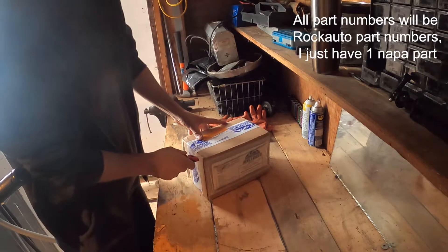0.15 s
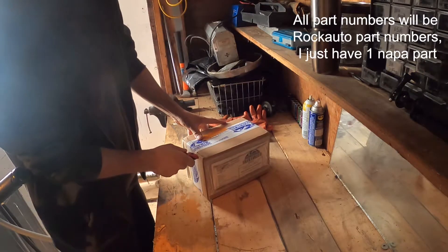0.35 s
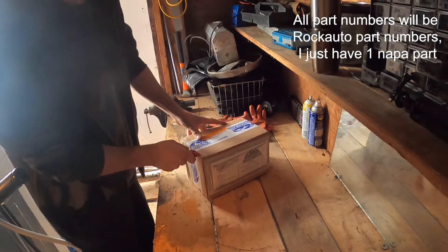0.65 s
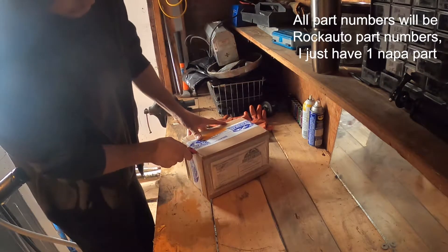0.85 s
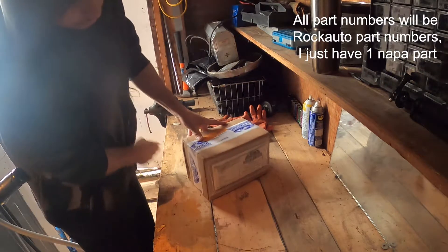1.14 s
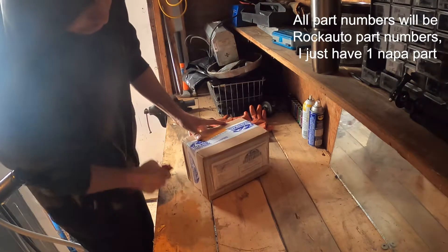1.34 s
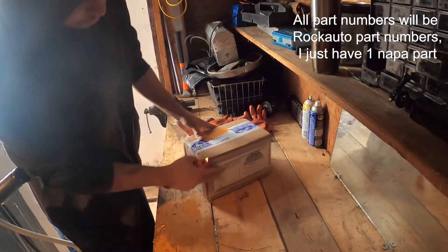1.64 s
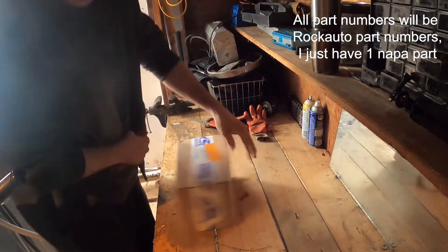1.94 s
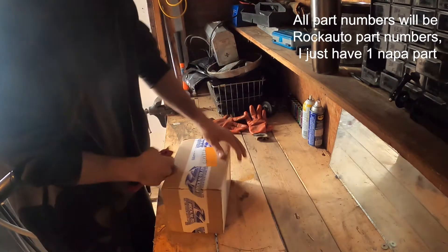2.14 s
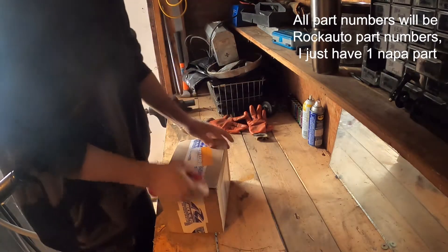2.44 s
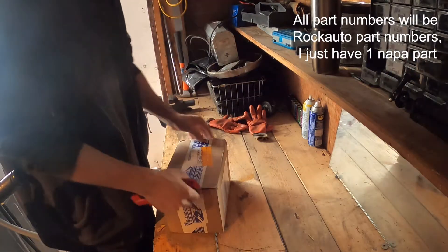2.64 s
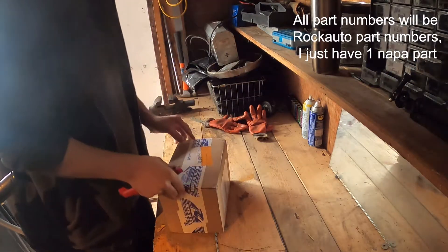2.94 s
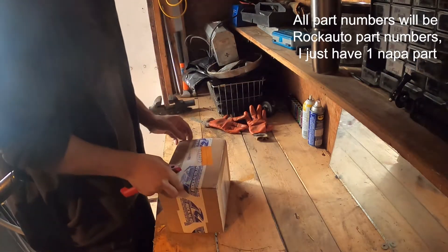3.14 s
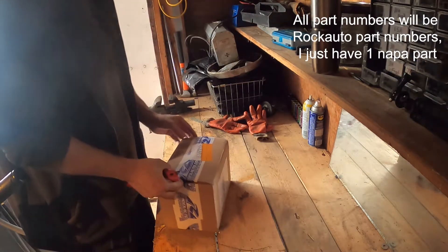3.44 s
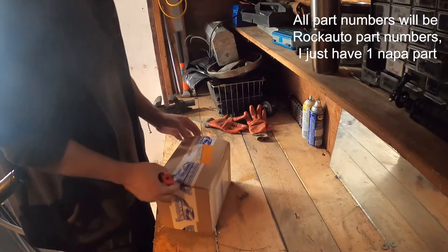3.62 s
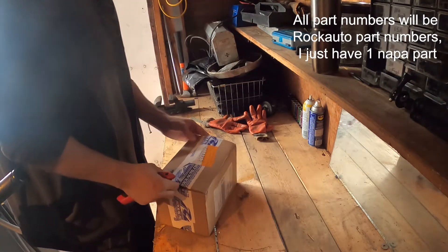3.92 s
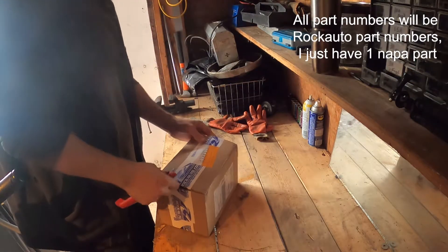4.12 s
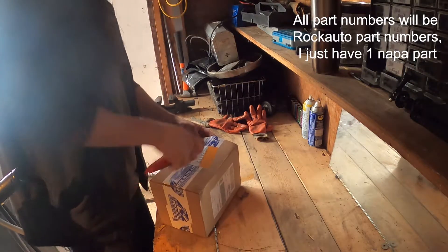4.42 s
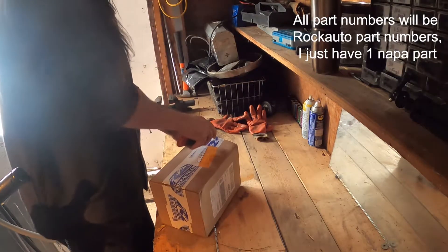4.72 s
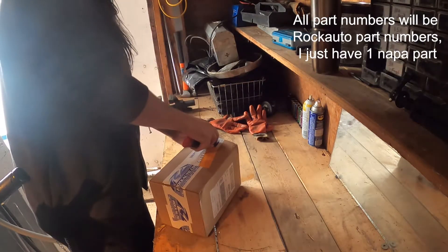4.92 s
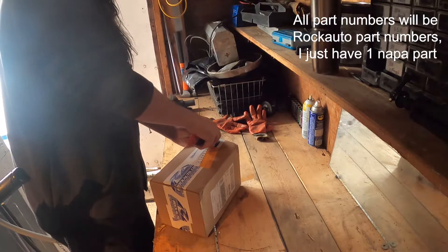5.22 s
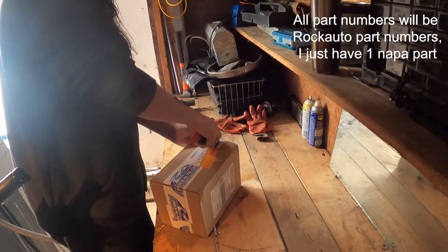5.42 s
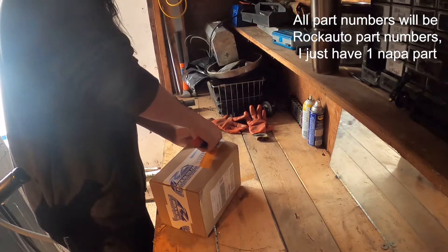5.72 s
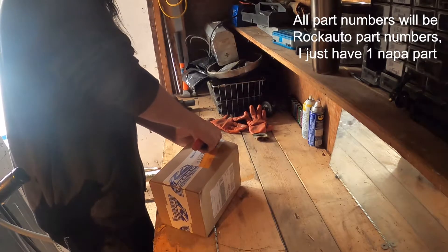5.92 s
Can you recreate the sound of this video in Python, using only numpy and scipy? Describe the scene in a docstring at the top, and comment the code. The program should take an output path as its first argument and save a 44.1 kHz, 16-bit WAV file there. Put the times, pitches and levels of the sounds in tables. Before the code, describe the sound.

Close in a small garage with a low, slowly growing rumble, a blade pricks tape and hands rub a cardboard box. Tape rips in sharp jerks with hollow thumps, then the box scrapes loudly round on a gritty wooden bench and knocks down. Light scratching, brief gritty slitting, a handle click and small crackling picks follow.

```python
"""A low, steady rumble fills a small garage; a blade tip pricks tape, a box is bumped and hands rub over it.
Then a utility knife rips the tape in jerks, and the box is swung round on a gritty wooden bench and set down.
The blade slits the top seam, clicks in its handle and picks at the far end of the tape.
Tape and grit are showers of tiny fractures under stick-slip envelopes, bumps are damped modes, the rest is
filtered noise; shifting reflections and a short tail reach a camera with two close microphone ports."""
import sys
import numpy as np
from scipy import signal
from scipy.fft import rfft, irfft, next_fast_len
from scipy.io import wavfile
from scipy.ndimage import uniform_filter1d

SR = 44100
rng = np.random.default_rng(int(sys.argv[2]) if len(sys.argv) > 2 else 0)


def to_wav(s):
    """Save 16-bit WAV."""
    ch = np.atleast_2d(s).T  # columns
    pcm = np.round(np.clip(ch, -1, 1) * 32767)  # PCM
    wavfile.write(sys.argv[1], SR, pcm.astype(np.int16))


N = 267587
T = np.arange(N) / SR
# padded transform length, and the frequency of each bin
SIZE = next_fast_len(N + SR // 4, real=True)
HZ = np.maximum(np.arange(SIZE // 2 + 1) * SR / SIZE, 1)
SIDES = np.array([[1], [-1]])  # left and right port

# Colour of the box walls drumming. Each row: frequency in Hz, relative level in dB.
BOX_DRUM = [(40, -7.5), (70, 4.5), (105, 1), (135, -7), (168, -0.5), (200, -8), (240, -11), (330, -18),
            (600, -30.5)]
# Resonances of the box bottom. Each row: frequency in Hz, width in Hz, lift in dB.
BOX_BOTTOM = [(350, 35, 2.5), (472, 21, 2), (1300, 70, 0.5), (1560, 73, -1), (1670, 86, 3), (3230, 60, -3),
              (3500, 59, 6.5), (4800, 45, 0.5)]
# Colour of snapping tape and cardboard. Each row: frequency in Hz, relative level in dB.
SNAP_TONE = [(700, -17), (1500, 5.5), (3000, -0.5), (5000, -3), (8000, -11), (11000, -22), (15000, -38)]
# Colour of a hollow knock from the box. Each row: frequency in Hz, relative level in dB.
KNOCK_TONE = [(110, -5.5), (180, 8.5), (330, 1), (480, 1), (700, -7), (1300, -8.5), (2500, -34)]


def undb(db):
    """Decibels to gain."""
    return 10 ** (np.asarray(db) / 20)


def unit(x):
    """Scale to rms 1."""
    return x / np.sqrt(np.mean(x ** 2))


def noise():
    """White noise of rms about 1."""
    return rng.standard_normal(N)


def walk(rate):
    """Smooth random drift of rms 1 that takes a new value `rate` times a second."""
    k = max(int(SR / rate), 1)
    steps = np.repeat(rng.standard_normal(N // k + 1), k)[:N]
    return unit(uniform_filter1d(steps, k))


def grains(rate, spread_db):
    """Tiny fractures at random moments, a few much larger than the rest, scaled to rms 1."""
    chance = rng.random(N)
    at = np.flatnonzero(chance < rate / SR)
    # the rarest fractures are the largest; each pushes or pulls
    rarity = np.minimum(-np.log(chance[at] * SR / rate), 3)
    push = np.where(rng.integers(0, 2, N, dtype=bool)[at], 1, -1)
    return unit(np.bincount(at, undb(spread_db * rarity) * push, N))


def slips(rate, scatter_db, decay_s):
    """Stick-slip envelope: tension lets go at uneven intervals and each release dies away."""
    chance = rng.standard_normal((8000, 2))
    wait = np.exp(.5 * np.clip(chance[:, 0], -2, 2))
    at = (np.cumsum(wait) * SR / rate).astype(int)
    # a longer wait stores more tension
    size = np.sqrt(wait) * undb(scatter_db * np.tanh(chance[:, 1]))
    kicks = np.bincount(at[at < N], size[at < N], N)
    return unit(signal.lfilter([1], [1, -np.exp(-1 / (decay_s * SR))], kicks))


def shape(points):
    """Gain at every frequency from (Hz, dB) points, falling steeply beyond the ends."""
    hz, db = np.transpose(points)
    octaves_beyond = np.maximum(np.log2(hz[0] / HZ), 0) + np.maximum(np.log2(HZ / hz[-1]), 0)
    return undb(np.interp(np.log(HZ), np.log(hz), db) - np.minimum(30 * octaves_beyond, 60))


def body(x, points, resonances=()):
    """Causal filter of a broad colour with resonant peaks; white noise keeps its power."""
    gain = shape(points)
    for hz, width, db in resonances:
        gain = gain * (1 + (undb(db) - 1) / (1 + (2 * (HZ - hz) / width) ** 2))
    # folding the cepstrum forward in time gives the minimum phase
    cepstrum = irfft(np.log(unit(gain)), SIZE)
    cepstrum[1:SIZE // 2] *= 2
    cepstrum[SIZE // 2:] = 0
    return irfft(rfft(x, SIZE) * np.exp(rfft(cepstrum)), SIZE)[:N]


def roaming(x, points, resonances, shift, rate):
    """The contact wanders over the cardboard, and its resonances sit higher or lower from place to place."""
    place, spots = walk(rate), (-1, 0, 1)
    shares = np.array([np.exp(-3 * (place - k) ** 2) for k in spots])
    shares /= shares.sum(0)
    out = np.zeros(N)
    for k, share in zip(spots, shares):
        moved = [(hz * (1 + shift * k), width, db) for hz, width, db in resonances]
        out += body(x * share, points, moved)
    return out


def ring(modes, t, tilt_db=0):
    """Damped modes after one blow, tilted in dB per octave above the first."""
    out = np.zeros(len(t))
    for hz, db, t60 in modes:
        level_db = db + tilt_db * np.log2(hz / modes[0][0]) - 60 * t / t60
        out += undb(level_db) * np.sin(2 * np.pi * hz * t)
    return out


def add(out, s, sound):
    """Mix a sound in at a time."""
    i = max(int(s * SR), 0)
    out[i:i + len(sound)] += sound[:max(N - i, 0)]


def gains(rows):
    """One gain curve for each dB column, silent outside the rows."""
    s, *columns = np.transpose(rows)
    out, inside = np.zeros((len(columns), N)), (T >= s[0]) & (T <= s[-1])
    out[:, inside] = [undb(np.interp(T[inside], s, c)) for c in columns]
    return out


def stroke(s, length, swell_db, attack_s, release_s):
    """Pressure of one hand movement: it builds, holds while swelling or easing, and dies away."""
    out = np.zeros(N)
    span = slice(max(int((s - attack_s) * SR), 0), int((s + length + 8 * release_s) * SR))
    t = T[span] - s
    build = np.clip(1 + t / attack_s, 0, 1) ** 2
    hold = undb(swell_db * (np.clip(t / length, 0, 1) - .5))
    out[span] = build * hold * np.exp(-np.maximum(t - length, 0) / release_s)
    return out


def strokes(rows, attack_s, release_s):
    """One summed pressure curve for each level column between length and swell."""
    return sum(undb(dbs)[:, None] * stroke(s, length, swell, attack_s, release_s)
               for s, length, *dbs, swell in rows)


def bursts(rows, knock_s, snap_s, split_db):
    """Envelopes of the knock and the snap of sudden cracks; each snap starts with a sharp split."""
    knocks, snaps, t = np.zeros(N), np.zeros(N), T[:SR // 8]
    split = undb(split_db) * np.exp(-t / .0007)
    for s, snap_db, knock_db in rows:
        add(knocks, s, undb(knock_db) * np.exp(-t / knock_s))
        add(snaps, s, undb(snap_db) * (np.exp(-t / snap_s) + split))
    return knocks, snaps


def squeaks(rows, waver, waver_rate):
    """Short unsteady stick-slip tones of an edge that catches."""
    out, drift = np.zeros(N), waver * walk(waver_rate)
    for s, hz, length, db in rows:
        span = slice(int((s - length / 2) * SR), int((s + length / 2) * SR))
        phase = 2 * np.pi * np.cumsum(hz * (1 + drift[span])) / SR
        swell = np.sin(np.linspace(0, np.pi, len(phase)))
        out[span] += undb(db) * np.sqrt(2) * swell * np.sin(phase)
    return out


def apart(x):
    """The part of a diffuse sound that differs between the ports, strongest in the treble."""
    # Difference between the ports. Each row: frequency in Hz, side minus mid of diffuse sound in dB.
    side_rows = [(100, -25.5), (300, -10), (700, -10), (1500, -9.5), (3000, -3.5), (6000, -0.5)]
    hz, db = np.transpose(side_rows)
    return irfft(rfft(x, SIZE) * undb(np.interp(np.log(HZ), np.log(hz), db)), SIZE)[:N]


def background():
    """A slowly growing rumble nearly alike at both ports, and faint wavering air that differs more."""
    # Colour of the garage rumble. Each row: frequency in Hz, relative level in dB.
    rumble_tone = [(12, -31.5), (20, 0.5), (38, -2), (91, 1), (113, -1.5), (121, -14), (130, -15),
                   (161, -13.5), (195, -24), (229, -18.5), (265, -41.5), (300, -36.5), (390, -52.5),
                   (660, -120)]
    # Colour of the garage air. Each row: frequency in Hz, relative level in dB.
    air_tone = [(150, -40.5), (250, -11.5), (350, -2.5), (414, -5), (499, -9), (533, -23.5), (600, -9.5),
                (869, -17.5), (1060, -4.5), (1350, -11.5), (1540, -12), (1920, -18.5), (2920, -27.5),
                (6560, -34.5), (14000, -66)]
    rise_db = 0.73 * (T - T[-1])  # dB per second
    # the air is up to 4 dB louder around one moment
    lift_db = 4 * (np.exp(-((T - 3.97) / 1.4) ** 2) - 1)
    rumble = body(noise(), rumble_tone) + undb(-16.5) * SIDES * body(noise(), rumble_tone)
    air = body(noise(), air_tone) + undb(2.5) * SIDES * apart(body(noise(), air_tone))
    return undb(-41 + rise_db) * rumble + undb(-61.5 + 0.23 * walk(27) + lift_db) * air


def sleeves():
    """Clothing whispers faintly, coming and going as the arms move."""
    # Colour of rustling cloth. Each row: frequency in Hz, relative level in dB.
    cloth_tone = [(2500, -5), (5800, 0), (8500, -5), (11000, -19)]
    level = undb(-81.5 + 3 * np.tanh(walk(7)))
    return body(level * grains(rate=4600, spread_db=3), cloth_tone)


def creaks(per_s, snap_db, knock_db, spread_db):
    """The shifting grip makes faint cracks at random moments, as rows like those of the picks."""
    when, snap, knock = rng.random((200, 3))[:int(per_s * T[-1])].T
    return np.column_stack([when * T[-1], snap_db - spread_db * snap, knock_db - spread_db * knock])


def picks():
    """The blade tip pricks the tape: a snap of tiny fractures and a hollow answer from the box."""
    # Pricks of the tip. Each row: start in seconds, relative snap level in dB, relative knock level in dB.
    prick_rows = [(.1435, -49, -59.5), (4.9837, -47.5, -55.5), (5.216, -58.5, -56), (5.4216, -39, -54.5),
                  (5.539, -53, -50), (5.553, -46, -55), (5.7175, -38, -49), (5.865, -55.5, -56),
                  (5.952, -50.5, -56.5), (6.0594, -41.5, -50.5)]
    # Colour of a prick. Each row: frequency in Hz, relative level in dB.
    prick_tone = [(600, -4.5), (1500, 6.5), (2600, -1.5), (4500, -11), (8000, -17.5), (11000, -35.5)]
    faint = creaks(per_s=5, snap_db=-59.5, knock_db=-64.5, spread_db=5.5)
    pokes, pricks = bursts([*prick_rows, *faint], knock_s=0.013, snap_s=0.008, split_db=-4.5)
    tip = body(pricks * grains(rate=18000, spread_db=2.0), prick_tone, BOX_BOTTOM)
    return undb(-9.5) * tip + undb(6.5) * body(pokes * noise(), KNOCK_TONE)


def thumps(ring_db):
    """A soft blow swings the box wall through a cycle or two, and box and bench ring on."""
    # Bumps and knocks on the bench. Each row: start in seconds, relative level in dB, pitch of the blow in Hz.
    bump_rows = [(0.178, -38, 285), (.879, -21.5, 96), (.916, -24, 70.5), (0.985, -17.5, 80),
                 (1.017, -16.5, 132), (1.07, -26.5, 118.7), (1.903, -27.5, 172), (2.195, -20, 173),
                 (2.7456, -37.5, 187), (3.159, -40, 316), (3.175, -33, 94), (3.767, -22, 137),
                 (3.795, -25, 101), (4.199, -28, 125), (4.2686, -24.5, 107), (4.335, -42, 150),
                 (4.984, -43.5, 210), (5.542, -39, 330)]
    # Modes of box and bench. Each row: frequency in Hz, relative level in dB, time to fall 60 dB in seconds.
    box_modes = [(77.5, -8.5, 0.56), (101, -10, 0.29), (149, -15.5, 0.27), (228.2, -18, 0.17),
                 (338, -26, 0.26), (440.5, -21, 0.085), (630, -27, 0.06)]
    out, t = np.zeros(N), T[:SR // 2]
    ringing = undb(ring_db) * ring(box_modes, t)
    for s, db, hz in bump_rows:
        blow = -np.sin(2 * np.pi * hz * t) * np.sin(np.pi * np.minimum(hz * t / 2.3, 1))
        add(out, s, undb(db) * (blow + ringing))
    return out


def hands():
    """Skin and cloth brush the box: a dull rub under a dry hiss."""
    # Brushes. Each row: start in seconds, length in seconds, relative rub level in dB,
    # relative hiss level in dB, swell over the stroke in dB.
    brush_rows = [(0.47, 0.082, -60.5, -89, 5), (0.58, 0.072, -59, -78, 4),
                  (0.732, 0.16, -56.5, -64.5, -0.5), (1.122, 0.32, -61.5, -73, -20.5),
                  (1.302, 0.028, -56.5, -72.5, -17), (2.212, 0.19, -48.5, -57, -11.5),
                  (2.422, 0.16, -55.5, -64.5, -12.5), (2.632, 0.31, -57.5, -60, -0.5),
                  (3.182, 0.1, -53, -63.5, -8), (3.361, 0.25, -65.5, -68, 8), (3.677, 0.14, -54.5, -62, 12),
                  (4.05, 0.14, -55, -75, -15), (4.279, 0.31, -54.5, -64, -11.5)]
    # Colour of the dull rub. Each row: frequency in Hz, relative level in dB.
    rub_tone = [(200, -24.5), (400, 3), (750, -11), (1300, -1.5), (2200, -6), (3200, -16.5), (4500, -20),
                (8000, -23)]
    # Colour of the dry hiss. Each row: frequency in Hz, relative level in dB.
    hiss_tone = [(1650, -23.5), (2800, -6), (3100, -8.5), (4240, -6), (6110, -12), (8490, -14),
                 (11000, -26.5), (12500, -25.5), (14000, -36), (15500, -40)]
    rub, hiss = strokes(brush_rows, attack_s=0.036, release_s=0.047)
    grip = unit(undb(1.9 * walk(110)))
    dull = body(rub * grip * grains(rate=4200, spread_db=2.0), rub_tone)
    dry_hiss = body(hiss * grip * grains(rate=7100, spread_db=2.5), hiss_tone)
    return undb(-5.5) * dull + undb(0.5) * dry_hiss


def pats(peak_s):
    """Fingertips press the box: each swelling touch crumples the tape and draws a hollow knock."""
    # Touches. Each row: start in seconds, relative knock level in dB, relative crumple level in dB.
    touch_rows = [(0.612, -55, -76), (0.637, -56.5, -82), (0.751, -51.5, -60.5), (1.156, -43.5, -78.5),
                  (1.55, -82, -62.5), (1.572, -58.5, -87), (3.18, -58, -60), (3.286, -52.5, -51.5),
                  (3.57, -67, -55), (5.208, -59.5, -71), (5.302, -59, -72), (5.476, -60.5, -65),
                  (5.564, -56.5, -64.5), (5.721, -55, -62.5), (5.741, -64, -67), (5.809, -58.5, -63),
                  (5.996, -59, -63.5)]
    knocks, creases, t = np.zeros(N), np.zeros(N), T[:SR // 8]
    press = t / peak_s * np.exp(1 - t / peak_s)
    for s, knock_db, crease_db in touch_rows:
        add(knocks, s, undb(knock_db) * press)
        add(creases, s, undb(crease_db) * press)
    crumple = body(creases * grains(rate=11000, spread_db=3), SNAP_TONE)
    return undb(3.0) * crumple + undb(5.5) * body(knocks * noise(), KNOCK_TONE)


def rips():
    """The tape gives way in jerks; each one sprays fractures and tugs the box wall."""
    # Tugs of the blade. Each row: start in seconds, length in seconds, relative levels in dB of tearing,
    # drumming of the box and fine sizzle, swell over the tug in dB.
    tug_rows = [(0.8791, 0.012, -36, -28.5, -35.5, -3.5), (0.899, 0.012, -43, -29.5, -59, -7),
                (0.981, 0.016, -32, -21, -37, 1), (1.012, .012, -34.5, -23, -36.5, 0),
                (1.026, .005, -27.5, -23.5, -39.5, 4), (1.037, 0.009, -28.5, -24.5, -33.5, 0),
                (1.065, 0.006, -28, -20.5, -52, 1), (4.188, 0.053, -53.5, -47.5, -55, 4),
                (4.246, 0.021, -42, -41, -59, 3)]
    # Colour of the tearing. Each row: frequency in Hz, relative level in dB.
    tear_tone = [(200, -16), (280, -6), (450, -16.5), (620, -9), (800, -12.5), (1100, -7.5), (2100, -9.5),
                 (3700, -9.5), (5500, -14.5), (7000, -28), (8500, -20), (12000, -30.5), (15500, -43.5)]
    # Colour of the sizzling film. Each row: frequency in Hz, relative level in dB.
    sizzle_tone = [(2500, -31), (4500, 8), (6500, -1.5), (8300, 1.5), (11000, -16), (15000, -23)]
    # Panel resonances under the blade. Each row: frequency in Hz, width in Hz, lift in dB.
    panels = [(497, 23.3, 1), (649, 45, 6.5), (1084, 180, 6.5), (1645, 29, 7), (2430, 85, 7.5),
              (2495, 28, 9), (2760, 57, 11), (3900, 35, -1)]
    tear, drum, sizzle = strokes(tug_rows, attack_s=0.0071, release_s=0.012)
    jerks = slips(rate=260, scatter_db=4, decay_s=0.0067)
    rasp = jerks * grains(rate=7000, spread_db=4.5)
    fibres = undb(-6.5) * grains(rate=220, spread_db=1.5)  # single snapping fibres
    tearing = roaming(tear * (rasp + fibres), tear_tone, panels, shift=.04, rate=40)
    film = body(sizzle * jerks * grains(rate=10000, spread_db=4), sizzle_tone)
    wall = body(drum * jerks * grains(rate=1400, spread_db=1.0), BOX_DRUM)
    return undb(1.0) * tearing + film + wall


def cracks():
    """Tape and cardboard crack suddenly, and the box answers with a hollow knock."""
    # Cracks. Each row: start in seconds, relative snap level in dB, relative knock level in dB.
    crack_rows = [(.8792, -16, -59), (.9836, -26, -27), (.9876, -19, -36), (1.029, -9, -25.5),
                  (1.0374, -6, -41.5), (1.0455, -16, -41.5), (1.0523, -12, -22.5), (1.0675, -6.5, -30.5),
                  (1.0715, -11, -30), (1.707, -30, -60.5), (1.772, -31, -50), (1.8405, -13.5, -41),
                  (1.8879, -11, -32), (1.9034, -15, -28.5), (1.9303, -8.5, -31), (2.062, -11, -39.5),
                  (2.1946, -32, -40), (2.26, -37, -44), (2.7462, -27.5, -48.5), (3.1014, -34, -51.5),
                  (3.113, -30.5, -66), (3.158, -47, -48.5), (3.7645, -26, -40.5), (3.8065, -42, -59),
                  (3.8853, -37, -50), (4.0314, -32, -49), (4.218, -38, -55), (4.2474, -30, -47),
                  (4.2644, -21.5, -50), (4.272, -27, -44)]
    knocks, snaps = bursts(crack_rows, knock_s=0.0061, snap_s=0.0051, split_db=-4)
    tape = body(snaps * grains(rate=11000, spread_db=3), SNAP_TONE)
    return undb(-17.0) * tape + undb(5.5) * body(knocks * noise(), KNOCK_TONE)


def catches(scrape, start_s, end_s, below_db, length_s, count):
    """Random fibres catch and sing for some cycles, as rows for squeaks, louder where the bottom scrapes harder."""
    when, pitch, size = rng.random((count, 3)).T
    s = start_s + when * (end_s - start_s)
    db = 20 * np.log10(np.interp(s, T, scrape)) + below_db - 8 * size
    return np.column_stack([s, 850 * 6 ** pitch, length_s * (.5 + size), db])


def slide():
    """The bottom scrapes over grit and wood grain with a flickering treble; the swinging box rumbles below."""
    # The box dragged round. Each row: time in seconds, relative scrape level in dB, lift of the treble in dB.
    drag_rows = [(1.705, -59, -2), (1.745, -43, -2), (1.778, -35.5, -5), (1.815, -35.5, -1.5),
                 (1.833, -39, 3.5), (1.846, -33, 3), (1.875, -30.5, 1.5), (1.935, -22, 1.5),
                 (1.975, -23.5, 1.5), (1.99, -28, 5), (2.016, -22, 0), (2.04, -33.5, -6.5),
                 (2.055, -33.5, 0), (2.066, -26, -5), (2.082, -36, 6), (2.097, -32, 0), (2.135, -39, -4),
                 (2.185, -58.5, 7)]
    # Colour of the scrape. Each row: frequency in Hz, relative level in dB.
    scrape_tone = [(180, -2), (290, -10), (350, -6.5), (500, -1), (700, -10), (920, -3.5), (1400, -1.5),
                   (2200, -4.5), (3300, -4.5), (4840, -5), (6240, -13), (8500, -14.5), (12000, -27.5),
                   (15500, -39)]
    level, treble = gains(drag_rows)
    scrape = undb(-0.5) * level
    # the rumble grows by 25.5 dB per second and follows a share of the scrape's swings
    since_peak = np.clip(T - T[scrape.argmax()], -.5, .5)
    rumble = undb(-34.5 + 25.5 * since_peak) * (scrape / scrape.max()) ** 0.27
    grit = grains(rate=5500, spread_db=3.8) * slips(rate=150, scatter_db=3.5, decay_s=.009)
    scraping = roaming(scrape * grit, scrape_tone, BOX_BOTTOM, shift=0.06, rate=30)
    bright = signal.sosfiltfilt(signal.butter(2, 3400, "high", fs=SR, output="sos"), scraping)
    caught = catches(scrape, drag_rows[0][0], drag_rows[-1][0], below_db=-1.0, length_s=.008, count=110)
    fibres = squeaks(caught, waver=0.045, waver_rate=970)
    return scraping + (treble - 1) * bright + body(rumble * noise(), BOX_DRUM) + fibres


def shudders(octaves):
    """The box judders over the boards in short, broad groans, each at its own pitch."""
    # Judders as it turns, settles and is nudged. Each row: middle in seconds, length in seconds,
    # relative level in dB, pitch in Hz.
    judder_rows = [(1.784, 0.073, -43.5, 230), (2.203, 0.033, -40, 450), (2.262, 0.11, -50.5, 416),
                   (2.319, 0.07, -46, 385), (2.353, 0.032, -54, 438), (2.434, 0.04, -51, 400),
                   (2.524, 0.059, -51, 365), (2.43, .14, -51, 180), (3.069, .1, -61, 340),
                   (3.167, 0.03, -48.5, 343), (3.42, .16, -59.5, 300), (3.79, 0.067, -42, 225)]
    out = np.zeros(N)
    jerks = uniform_filter1d(slips(rate=110, scatter_db=2, decay_s=.012), size=150)
    for s, length, db, hz in judder_rows:
        edges = hz * 2 ** (octaves * np.array([-.5, .5]))
        band = signal.butter(2, edges, "band", fs=SR, output="sos")
        swell = np.sin(np.linspace(0, np.pi, int(length * SR)))
        tone = signal.sosfilt(band, noise())[-len(swell):]
        groan = unit(tone * jerks[int(s * SR):][:len(swell)])
        add(out, s - length / 2, undb(db) * swell * groan)
    return out


def chirps():
    """A cardboard edge or the blade catches and chirps in short wavering tones."""
    # Chirps. Each row: middle in seconds, frequency in Hz, length in seconds, relative level in dB.
    chirp_rows = [(1.8, 3860, .08, -37.5), (1.812, 5550, .04, -42), (1.843, 4800, 0.015, -32.5),
                  (1.865, 5150, 0.033, -36.5), (1.888, 3950, .025, -34.5), (1.895, 497.6, .05, -33.5),
                  (1.912, 4950, 0.026, -30), (1.915, 7970, .07, -41), (1.95, 7150, .035, -35.5),
                  (1.935, 1390, .014, -24.5), (1.948, 1350, .018, -24.5), (1.968, 1546, .013, -23),
                  (1.966, 4670, .022, -28.5), (1.981, 3240, .014, -17.5), (2.005, 1830, .018, -28),
                  (2.01, 2397, .018, -27.5), (2.022, 1057, 0.019, -31), (2.066, 1573, .016, -32),
                  (2.103, 973, .03, -33), (2.645, 1830, .014, -55), (3.085, 4080, .025, -53),
                  (3.108, 4405, .016, -52), (3.975, 3420, .025, -44), (4.035, 3400, .02, -43)]
    return squeaks(chirp_rows, waver=0.0485, waver_rate=1300)


def slit():
    """The edge skates on the film, then glides along the seam in a gritty rasp, snapping single fibres."""
    # Skating without piercing. Each row: start in seconds, length in seconds, relative level in dB, swell in dB.
    skate_rows = [(2.782, 0.23, -62.5, -11), (3.008, 0.1, -54.5, 7.5), (3.191, 0.02, -57, 3),
                  (3.254, 0.041, -55, 0)]
    # Glides along the seam. Each row: start in seconds, length in seconds, relative level in dB, swell in dB.
    glide_rows = [(3.89, 0.054, -45, -0.5), (3.968, 0.028, -44.5, -3.5), (4.012, 0.026, -43, 2),
                  (4.225, 0.054, -44.5, 3)]
    # Colour of the skating tip. Each row: frequency in Hz, relative level in dB.
    skate_tone = [(2000, -3), (3200, -7), (4200, 3.5), (5200, -4), (6500, -11), (8500, -11), (13000, -36)]
    # Colour of the parting seam. Each row: frequency in Hz, relative level in dB.
    seam_tone = [(220, -8), (500, -4), (840, -11), (1200, -7.5), (1540, -1), (2400, -2), (3600, -2),
                 (4400, -6.5), (6000, -12.5), (8500, -21), (12000, -28), (15500, -44)]
    touch, = strokes(skate_rows, attack_s=0.051, release_s=0.0091)
    pull, = strokes(glide_rows, attack_s=0.051, release_s=0.0091)
    rasp = slips(rate=380, scatter_db=3, decay_s=.004) * grains(rate=5000, spread_db=4.5)
    rasp = rasp + undb(-13) * grains(rate=110, spread_db=2)  # single fibres
    wall = undb(1.5) * body(pull * noise(), BOX_DRUM)
    return body(touch * rasp, skate_tone) + body(pull * rasp, seam_tone) + wall


def knife(crack_db, crack_s):
    """Steel taps the handle: a dry crack and a brief ring, damped by the hand."""
    # Clicks. Each row: start in seconds, relative level in dB, brightness in dB per octave.
    click_rows = [(4.6227, -34, -7), (4.696, -46.5, 6)]
    # Modes of the knife. Each row: frequency in Hz, relative level in dB, time to fall 60 dB in seconds.
    steel_modes = [(1293, -4, 0.07), (1570, -11.5, 0.033), (1790, -17, 0.031), (2324, -13.5, .025),
                   (2780, 5, 0.093), (2850, 9, 0.025), (3550, 9.5, 0.036), (4110, 17, 0.023),
                   (4750, 7, 0.023), (6800, -2, 0.08)]
    rings, taps, t = np.zeros(N), np.zeros(N), T[:SR // 4]
    for s, db, tilt_db in click_rows:
        tone = ring(steel_modes, t, tilt_db)
        add(rings, s, undb(db) * tone / np.abs(tone).max())
        add(taps, s, undb(db + crack_db) * np.exp(-t / crack_s))
    return rings + body(taps * noise(), SNAP_TONE)


def garage(x, near_db, near_s, tail_db, t60_s, dull_hz, scatter_db):
    """Bench and shelves return close reflections that shift as box and arms move; the room adds a duller tail."""
    # long waves bend round the clutter and hardly come back
    clutter = signal.butter(2, 330, "high", fs=SR, output="sos")
    sent = rfft(signal.sosfilt(clutter, x), SIZE) / np.sqrt(N)

    def heard(response):
        """Convolve the sent sound with one echo pattern."""
        return irfft(sent * rfft(unit(response), SIZE), SIZE)[:N]

    # three echo patterns trade places at constant power
    paths = np.array([walk(12) for _ in range(3)])
    paths /= np.linalg.norm(paths, axis=0)
    near = np.zeros(N)
    for path in paths:
        near += path * heard(grains(rate=3300, spread_db=8.0) * np.exp(-T / near_s) * (T > .001))
    dull = signal.sosfilt(signal.butter(1, dull_hz, fs=SR, output="sos"), noise())
    tail = heard(dull * undb(-60 * T / t60_s) * (T > .008))
    echoes = undb(near_db) * near + undb(tail_db) * tail
    # every fracture radiates from another spot, so the ports hear the treble differently from moment to moment
    bearing = np.sqrt(2) * np.sin(np.pi * walk(250))
    side = bearing * apart(undb(scatter_db) * x + undb(2.0) * echoes)
    return undb(-2.0) * (x + echoes + SIDES * side)


def scene():
    """All the handling sounds in the garage, over its background."""
    work = sleeves() + picks() + thumps(ring_db=-1.5) + hands() + pats(peak_s=0.0047)
    work += rips() + cracks() + slide() + shudders(octaves=0.57) + chirps() + slit()
    work += knife(crack_db=-6.0, crack_s=0.0044)
    room = garage(work, near_db=-5.5, near_s=0.0091, tail_db=-17.5, t60_s=0.31, dull_hz=6000, scatter_db=-11.5)
    return room + background()


def record(dry):
    """The left port hears everything slightly later and duller; the top is cut off above 15.6 kHz."""
    # How the two ports hear. Each row: frequency in Hz, left minus right in dB, lag of the left in radians.
    port_rows = [(100, -0.36, .01), (703, -0.5, .12), (1400, -0.1, .3), (2700, 1, 0.39), (5000, -1, 1.2),
                 (8800, -4, 1.1), (13000, -4, 1.7)]
    hz, *columns = np.transpose(port_rows)
    db, lag = (np.interp(np.log(HZ), np.log(hz), column) for column in columns)
    # each port takes half of the difference
    lean = undb(db / 2) * np.exp(-.5j * lag)
    fade = np.minimum(np.minimum(T, T[-1] - T) / .002, 1)
    ports = irfft(rfft(dry * fade, SIZE) * np.array([lean, 1 / lean]), SIZE)[:, :N]
    return signal.sosfilt(signal.ellip(8, .2, 70, 15600, fs=SR, output="sos"), ports)


dry = scene()
out = record(dry)
to_wav(out)
```